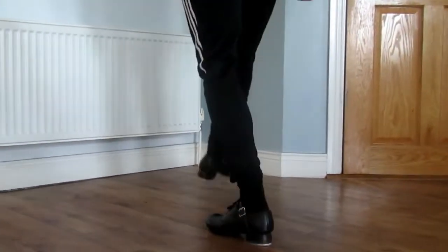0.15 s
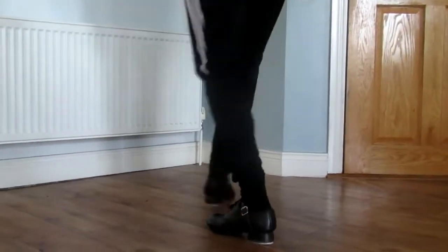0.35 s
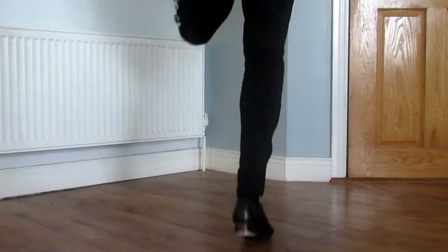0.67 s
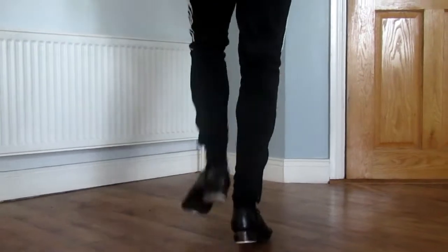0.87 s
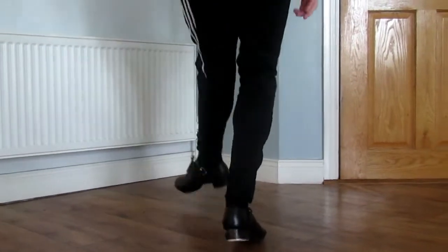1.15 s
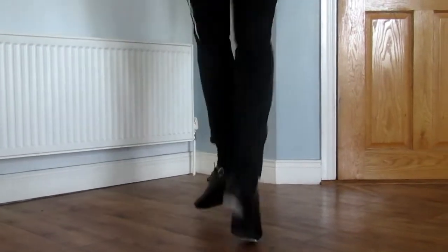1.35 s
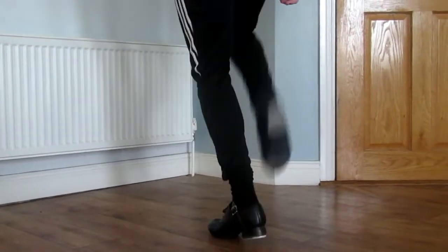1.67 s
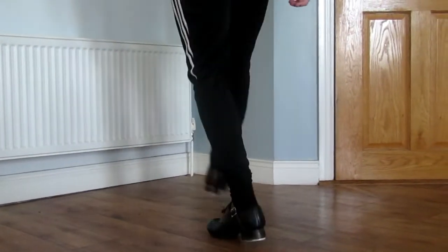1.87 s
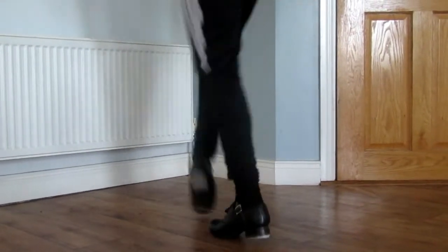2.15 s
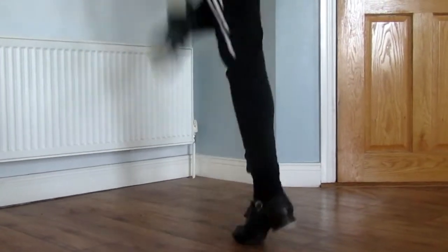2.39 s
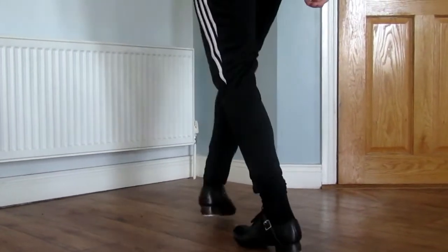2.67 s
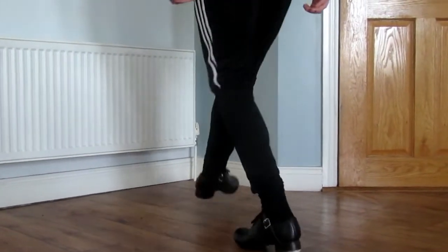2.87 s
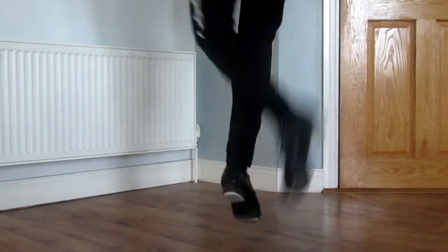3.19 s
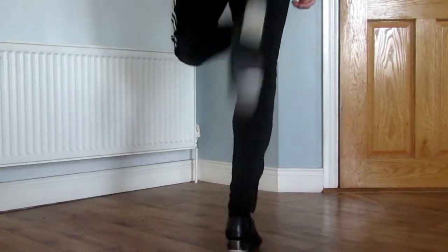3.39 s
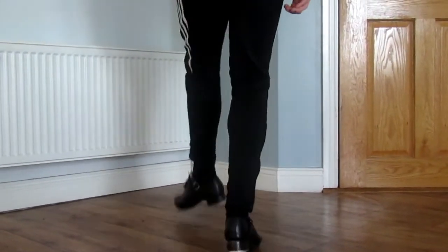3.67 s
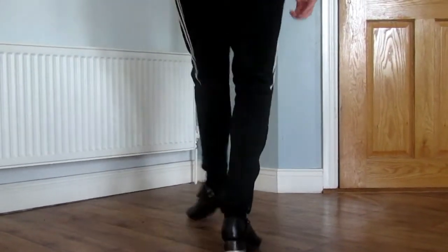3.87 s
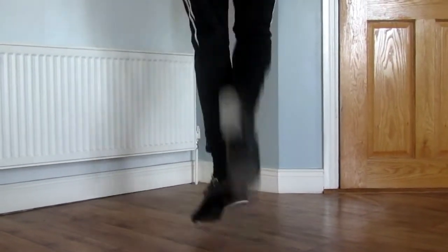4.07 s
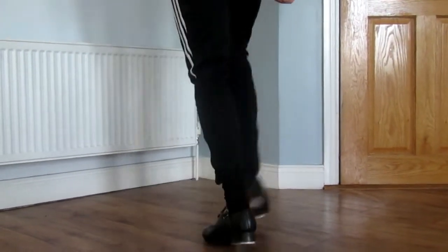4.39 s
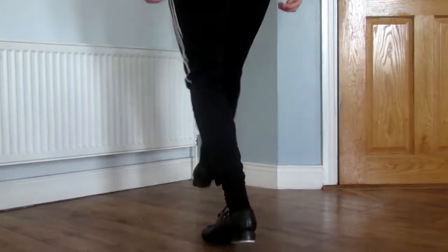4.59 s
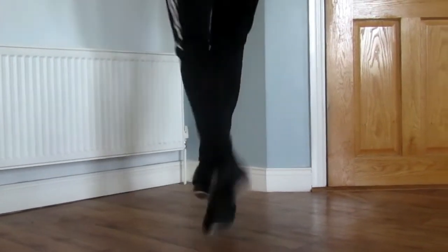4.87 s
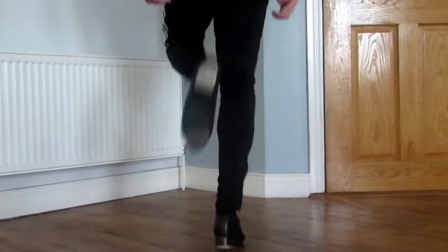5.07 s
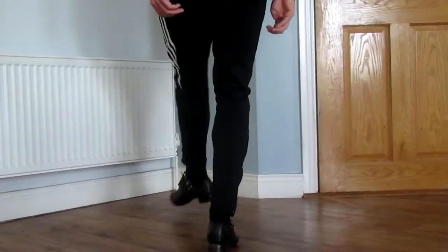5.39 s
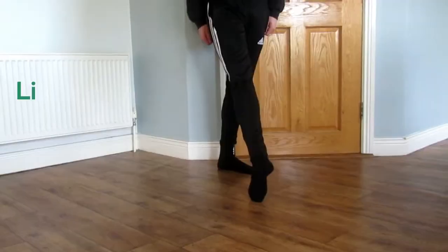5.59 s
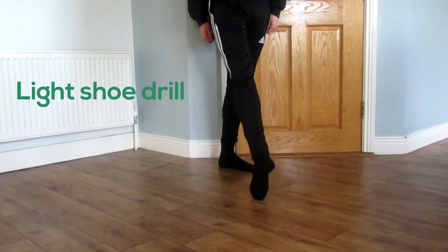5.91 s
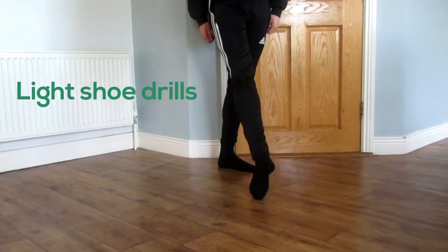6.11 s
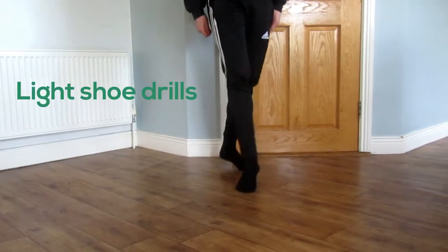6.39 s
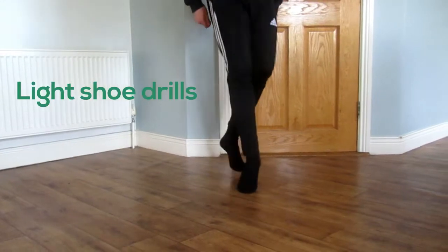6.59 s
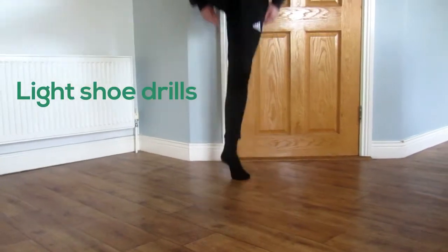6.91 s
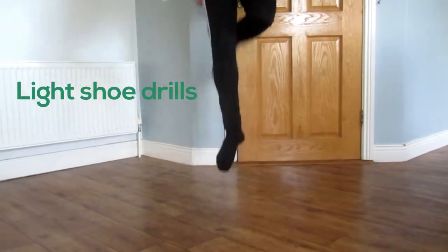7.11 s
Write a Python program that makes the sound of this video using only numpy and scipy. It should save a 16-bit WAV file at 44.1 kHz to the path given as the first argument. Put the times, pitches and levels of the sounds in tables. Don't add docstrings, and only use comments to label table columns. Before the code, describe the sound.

In a small bare room, hard dance shoes beat a wooden floor about three or four times a second, sharp clicks with woody thuds and a bright room ring. Soles scuff and buckles tick between. The ring cuts to brief total silence, then faint hiss and tiny motor ticks, before a soft-shod dancer slides, pushes off and lands with a dull double thump. Close small microphone, slightly overloaded.

```python
import sys
import numpy as np
from scipy import signal
from scipy.fft import rfft, irfft
from scipy.io import wavfile
from scipy.ndimage import uniform_filter1d

SR = 44100
rng = np.random.default_rng(int(sys.argv[2]) if len(sys.argv) > 2 else 0)


def digitize_waveform(pressure):
    field = np.atleast_2d(pressure).T
    bounded = np.clip(field, -1, 1)
    quanta = np.round(bounded * 32767).astype(np.int16)
    wavfile.write(sys.argv[1], SR, quanta)


def undo_db(level):
    steps = np.asarray(level, float) / 20
    return 10 ** steps


N = 319725
RUN_IN = SR // 2
SILENCE_START_S, SILENCE_END_S = 5.505, 5.7185


def rms_one(x):
    return x / np.sqrt(np.mean(x ** 2) + 1e-20)


def at_hz(points, hz):
    table = np.array(points)
    return np.interp(np.log(hz), np.log(table[:, 0]), table[:, 1])


def add(track, s, sound):
    i = round(s * SR) + RUN_IN
    track[i:i + len(sound)] += sound[:len(track) - i]


def struck(hz, t60, size=8192):
    t = np.arange(size) / SR
    return np.sin(2 * np.pi * hz * t) * undo_db(-60 * t / t60)


def resonance(x, hz, width_hz):
    r = np.exp(-np.pi * width_hz / SR)
    gain = (1 - r * r) / 2
    return signal.lfilter([gain, 0, -gain], [1, -2 * r * np.cos(2 * np.pi * hz / SR), r * r], x)


def band_noise(x, low, high):
    return signal.sosfilt(signal.butter(2, [low, high], "band", fs=SR, output="sos"), x)


def low_pass(x, hz):
    return signal.sosfilt(signal.butter(2, hz, fs=SR, output="sos"), x)


def coloured(x, spectrum):
    hz = np.fft.rfftfreq(len(x), 1 / SR) + 1
    below, above = (spectrum[0][0] / 2, -60), (spectrum[-1][0] * 2, -60)
    closed = [below] + list(spectrum) + [above]
    return rms_one(irfft(rfft(x) * undo_db(at_hz(closed, hz)), len(x)))


# start in seconds, peak of the tip click in dB, thud in dB, sole clack in dB, clack pitch in Hz.
FLAT_TAPS = [
    (0.0361, 0, -29, -30.5, 1110),
    (0.329, -9, -32, -32.5, 1210),
    (1.2464, -6.5, -29, -30.5, 1220),
    (3.878, -0.5, -25.5, -24.5, 1080),
]
TOE_TAPS = [
    (0.6123, 3.5, -28, -27.5, 1440),
    (3.2693, -2.5, -27.5, -26.5, 1510),
    (4.9838, 2, -29, -28.5, 1550),
]
HEEL_TAPS = [
    (0.943, 0, -23.5, -29.5, 1650),
    (1.8077, -13, -26, -23, 1670),
    (3.5972, -6.5, -24, -34, 1790),
    (4.4338, -11, -31, -28.8, 1310),
]
DROP_TAPS = [
    (2.7167, -7, -24.5, -31.5, 1420),
    (2.9623, -7.5, -30, -30.5, 1667),
    (4.7252, -13, -33.5, -33, 1590),
    (5.2887, 3, -27.5, -29, 1740),
]
TIP_TAPS = [
    (2.1411, 4.7, -35, -23.5, 1710),
    (2.3747, 7.8, -28.5, -26.5, 1845),
]
BALL_TAPS = [
    (1.4842, 3, -25, -28.5, 1665),
    (4.132, 3.5, -25.5, -28.5, 1730),
]
# boom and knock in dB over the thud, grit and air in dB over the clack,
# width of the clack in octaves.
FLAT = (0.5, -1.5, -10, -16, 0.66)
TOE = (-1.5, -15, -13.5, -17.5, 0.31)
HEEL = (-9.5, -7.5, -10.5, -10.5, 0.33)
DROP = (-4, -1.5, -11.5, -16, 0.4)
TIP = (-3, -8, -9.5, -16.5, 0.52)
BALL = (-2.5, -6, -14, -16.5, 0.4)
# tip click in dB, thud in dB, clack in dB, clack pitch in Hz.
EARLIER_TAP = (-40, -24, -33, 1500)
EARLIER_TAP_S = -0.2


def all_taps():
    kinds = ((FLAT_TAPS, FLAT), (TOE_TAPS, TOE), (HEEL_TAPS, HEEL),
             (DROP_TAPS, DROP), (TIP_TAPS, TIP), (BALL_TAPS, BALL))
    heard = sorted(row + colour for rows, colour in kinds for row in rows)
    return heard + [(EARLIER_TAP_S,) + EARLIER_TAP + HEEL]


# pitch in Hz, level in dB, time to fall 60 dB in seconds.
BOARDS = [(170, -3, 0.4), (213.8, 1.5, 0.51), (252, -19.5, 0.28), (316, -4, 0.58), (379.3, -2, 0.82),
          (421.6, 1.5, 0.4), (499, -5.5, 0.58)]


def taps():
    dull_tip_hz, sharp_from_db, db_per_octave = 1000, -5.5, 9.0
    clicks, swings = np.zeros((2, N + RUN_IN))
    rows = all_taps()[:-1]
    chance = rng.normal(0, 1, (len(rows), len(BOARDS)))
    for (s, click_db, thud_db, clack_db, clack_hz, *_, octaves), spread in zip(rows, chance):
        click_hz = dull_tip_hz * 2 ** (max(click_db - sharp_from_db, 0) / db_per_octave)
        tip = struck(click_hz * 1.3, 1.73 / click_hz, size=512)
        add(clicks, s, -undo_db(click_db - 3.0) * tip / tip.max())
        thud = struck(314, 0.04)
        add(swings, s + 0.00063, undo_db(thud_db + 14.0) * thud)
        clack = struck(clack_hz, 2.2 / (octaves * clack_hz))
        add(swings, s, -undo_db(clack_db + 17.5) * clack)
        for (hz, db, t60), z in zip(BOARDS, spread):
            height = np.sign(z) * undo_db(thud_db + db - 4.0 + 4.37 * abs(z))
            add(swings, s + 0.00403, height * struck(hz, t60, size=SR // 2))
    return clicks, swings


# delay in seconds, level in dB.
ECHOES = [(.0035, -36.5), (.0055, -16.5), (0.0134, -12.5), (0.019, -25)]


def first_echoes(clicks):
    dull = low_pass(clicks, 4500)
    return sum(undo_db(db) * np.roll(dull, round(s * SR)) for s, db in ECHOES)


def separate_reflections(at, depth_db=3.5, merge_s=0.04):
    fresh = np.zeros(N + RUN_IN)
    fresh[at] = 1
    fresh = np.minimum(signal.lfilter([1], [1, -np.exp(-1 / (merge_s * SR))], fresh), 1)
    clumps = uniform_filter1d(rng.standard_normal(N + RUN_IN), size=70)
    clumps = rms_one(uniform_filter1d(clumps, size=70))
    return undo_db(depth_db * fresh * clumps)


RING_HZ = (150, 340, 780, 3650, 7500)
RING_OCTAVES = (0.35, 0.42, 0.33, 0.29, 0.42)
# pitch in Hz, filling time in seconds.
BUILD = [(100, 0.0031), (300, 0.013), (1000, 0.00081), (8000, 0.0047)]
# pitch in Hz, time to fall 60 dB in seconds.
ROOM_T60 = [(80, 0.37), (210, 0.48), (560, 0.61), (1470, 0.61), (3880, 0.59), (10200, 0.38)]


def tap_reverberation(crack_db=-12.0, crack_t60=0.017):
    edges = 70 * 2 ** np.arange(0, 8.0, 1 / 4)
    white, out = rng.standard_normal((2, N + RUN_IN)), np.zeros(N + RUN_IN)
    rows = np.array(all_taps())
    thud_db, clack_db, clack_hz, boom_db, knock_db, grit_db, air_db, octaves = rows[:, 2:].T
    at = np.round(rows[:, 0] * SR).astype(int) + RUN_IN
    levels_db = np.column_stack([thud_db + boom_db, thud_db, thud_db + knock_db,
                                 clack_db, clack_db + grit_db, clack_db + air_db])
    low_hz = np.tile(RING_HZ[:3], (len(rows), 1))
    high_hz = np.tile(RING_HZ[3:], (len(rows), 1))
    centres = np.column_stack([low_hz, clack_hz, high_hz])
    widths = np.insert(np.tile(RING_OCTAVES, (len(rows), 1)), 3, octaves, axis=1)
    clumps = separate_reflections(at)
    for k, (low, high) in enumerate(zip(edges, edges[1:])):
        hz = np.sqrt(low * high)
        share = np.exp(-0.5 * (np.log2(hz / centres) / widths) ** 2) / widths
        power = np.zeros(N + RUN_IN)
        power[at] = np.sum(undo_db(levels_db) ** 2 * share, axis=1) * undo_db(-7.5)
        ring, crack = [signal.lfilter([1], [1, -undo_db(-120 / (t60 * SR))], power + 1e-18)
                       for t60 in (at_hz(ROOM_T60, hz), crack_t60)]
        fill = np.exp(-1 / (at_hz(BUILD, hz) * SR))
        envelope = signal.lfilter([1 - fill], [1, -fill], ring + undo_db(crack_db) * crack)
        band = band_noise(white[k % 2] * clumps, low, high)
        out += np.sqrt(np.abs(envelope)) * rms_one(band)
    return out


# start in seconds, level in dB, length in seconds, centre pitch in Hz.
SCUFFS = [(0.034, -30, 0.054, 5970), (0.462, -36, 0.065, 5000), (0.965, -40, 0.03, 6030),
          (1.341, -43, 0.085, 3960), (1.731, -37.5, 0.36, 4240), (2.964, -49, 0.073, 6000),
          (5.3, -34, 0.051, 6760), (1.597, -38, 0.11, 6880), (1.823, -37, 0.22, 5060),
          (2.781, -46, 0.046, 11000), (3.09, -45, 0.096, 8000), (3.559, -43, 0.048, 4980),
          (3.603, -29.5, 0.036, 5560), (3.792, -34.5, 0.025, 7020), (3.998, -37.5, 0.044, 3000),
          (4.842, -42.5, 0.061, 1504), (4.311, -39, 0.044, 6800), (4.445, -38.5, 0.066, 6040),
          (4.677, -41.5, 0.13, 7000), (4.86, -40, 0.13, 6700), (5.21, -57, 0.041, 8000),
          (6.347, -75, 0.035, 1300)]


def scuffs(grain_db=4.5):
    out = np.zeros(N + RUN_IN)
    draws = rng.standard_normal((len(SCUFFS), 2, 8192))
    for (s, db, length, hz), (noise, grain) in zip(SCUFFS, draws):
        phase = np.arange(8192) / SR / length
        swell = (1 - np.exp(-phase / 0.26)) * np.exp(-1.5 * phase ** 2)
        rough = undo_db(grain_db * rms_one(uniform_filter1d(grain, size=60)))
        drag = rms_one(resonance(noise * rough, hz, hz * 1.3))
        add(out, s, undo_db(db + 1.5) * swell * drag)
    return out


# level in dB, pitch in Hz, time to fall 60 dB in seconds.
BUCKLE_RING = (-61, 13700, 0.58)


def buckle_ring():
    db, hz, t60 = BUCKLE_RING
    out = np.zeros(N + RUN_IN)
    shimmer = rms_one(resonance(rng.standard_normal(8192), hz, 700))
    add(out, 2.783, shimmer * undo_db(db - 60 * np.arange(8192) / SR / t60))
    return out


# start in seconds, peak in dB, pitch in Hz.
TICKS = [(1.257, -14.5, 9000), (1.372, -25.5, 2800), (1.3785, -20.5, 3300), (1.3808, -18.5, 2420),
         (1.604, -34, 8000), (1.621, -25.5, 6000), (1.65, -27, 8400), (1.679, -29, 10000),
         (1.846, -31, 5500), (2.727, -20, 5800), (2.783, -27, 11500), (2.80, -25, 12000),
         (3.107, -35, 10500), (3.255, -19.5, 7000), (3.56, -29, 5700), (3.793, -32, 8000),
         (3.888, -9, 6500), (4.024, -26.5, 2700), (4.318, -39, 8000), (4.68, -34, 11000),
         (4.697, -28, 8550), (4.698, -34, 2580), (4.891, -28, 7000), (4.921, -23.5, 9000),
         (6.342, -48, 1300), (6.434, -41, 2600), (6.454, -43, 2480), (6.682, -37.5, 840),
         (6.936, -38, 2300), (6.937, -32, 10500)]


def ticks():
    answer_s, answer_db, answer_hz = 0.014, 2, 8000
    out = np.zeros(N + RUN_IN)
    t = np.arange(1024) / SR
    answers = [(row[0] + answer_s, row[3] + answer_db, answer_hz) for row in all_taps()[:-1]]
    for s, db, hz in TICKS + answers:
        swell = 1 - np.exp(-t * hz / 1.2)
        add(out, s, undo_db(db + 11.5) * swell * struck(hz, 11.0 / hz, size=1024))
    return out


# start in seconds, peak in dB, pitch in Hz.
SOFT_STEPS = [(0.461, -18.5, 188), (.482, -16, 156), (1.531, -38, 133), (3.14, -21, 190), (3.163, -20, 337),
              (0.511, -21.5, 233), (4.87, -29.5, 189), (4.928, -29, 140), (1.378, -25, 200),
              (6.455, -36, 304), (7.2338, -20.5, 242), (7.2435, -14.5, 260)]


def soft_steps():
    out = np.zeros(N + RUN_IN)
    swell = 1 - np.exp(-np.arange(8192) / SR / 0.0011)
    for s, db, hz in SOFT_STEPS:
        add(out, s, undo_db(db + 2.5) * swell * struck(hz, 0.045))
    return out


# pitch in Hz, level in dB.
ROOM_COLOUR = [(80, -1), (250, 1.5), (1000, -2.5), (3000, -7), (8000, -10.5), (14000, -17)]


def room(x, build_s=0.014):
    t = np.arange(SR) / SR
    edges = 60 * 2 ** np.arange(0, 8.3, 0.5)
    white, tail = rng.standard_normal((2, SR)), np.zeros(SR)
    for k, (low, high) in enumerate(zip(edges, edges[1:])):
        hz = np.sqrt(low * high)
        fall = undo_db(at_hz(ROOM_COLOUR, hz) - 60 * t / at_hz(ROOM_T60, hz))
        tail += fall * band_noise(white[k % 2], low, high)
    tail *= undo_db(-29.5) * (1 - np.exp(-t / build_s))
    return signal.fftconvolve(x, tail)[:len(x)]


def gestures(rows, rise_db_per_s, fall_db_per_s):
    t = np.arange(N) / SR
    moves = []
    for s, db, hold in rows:
        before, after = np.maximum(s - t, 0), np.maximum(t - s - hold, 0)
        moves.append(db - rise_db_per_s * before - fall_db_per_s * after)
    return np.max(moves, axis=0)


# time in seconds, level in dB.
RISING = [
    (6.3, -72),
    (6.346, -60),
    (6.431, -59),
    (6.436, -45),
    (6.552, -42.5),
    (6.704, -44.5),
    (6.82, -57),
]
LANDING = [
    (6.912, -58),
    (6.94, -52),
    (7.0, -51.5),
    (7.078, -54.5),
    (7.212, -45.5),
]
# start in seconds, level in dB, hold in seconds.
WEIGHT_SHIFTS = [
    (6.455, -44.5, 0.017),
    (6.615, -36.5, .025),
    (6.68, -33.5, 0.031),
    (6.94, -42.5, 0.076),
    (7.228, -43, .05),
]
# start in seconds, level in dB, hold in seconds.
LEG_SWINGS = [
    (6.53, -47.5, 0.084),
    (6.94, -55.5, 0.087),
    (7.2, -50.5, .05),
]
# pitch in Hz, level in dB per Hz.
SLIDE = [(400, -2.5), (650, 3.5), (1000, -0.5), (1600, -1.5), (2500, -6), (3500, -12)]
CLOTH = [(1760, -24), (3000, 4), (5920, -1.5), (6420, -2), (11900, -9.5), (15000, -16)]


def soft_shoe():
    slide_db = np.interp(np.arange(N) / SR, *np.transpose(RISING + LANDING), left=-99)
    noise = rng.standard_normal((3, N))
    flex = coloured(noise[0], [(70, -13.0), (110, -2.5), (150, 0.5), (230, -5.5), (400, -11.5)])
    flex = undo_db(gestures(WEIGHT_SHIFTS, rise_db_per_s=284, fall_db_per_s=153)) * flex
    slide = undo_db(slide_db) * coloured(noise[1], SLIDE)
    cloth = undo_db(gestures(LEG_SWINGS, rise_db_per_s=108, fall_db_per_s=65)) * coloured(noise[2], CLOTH)
    return flex + slide + cloth


# start in seconds, peak in dB, pitch in Hz.
JOLTS = [
    (1.5, -35, 45),
    (3.57, -53, 60),
    (4.17, -40, 40),
    (5.05, -42, 45.2),
    (6.64, -34, 49.6),
    (6.7, -31, 65.5),
]


def jolts():
    out = np.zeros(N + RUN_IN)
    swell = 1 - np.exp(-np.arange(SR // 2) / SR / 0.014)
    for s, db, hz in JOLTS:
        add(out, s, undo_db(db + 3.5) * swell * struck(hz, 0.27, size=SR // 2))
    return out


def focus_motor():
    start_s, step_s, count = 5.733, 0.0401, 11
    out = np.zeros(N + RUN_IN)
    t = np.arange(1024) / SR
    kick = (1 - np.exp(-t / 0.0014)) * np.exp(-t / 0.0049)
    for k, noise in enumerate(rng.standard_normal((count, 1024))):
        ring = resonance(noise * kick, 2600, 460)
        level_db = -48 + 1 * noise[0]
        add(out, start_s + k * step_s, undo_db(level_db) * ring / np.abs(ring).max())
    return out[RUN_IN:]


# pitch in Hz, level in dB per Hz.
HISS = [(25, -20), (54, -0.5), (77, -12), (150, -7.5), (1450, -15), (1720, -20), (11600, -31.5),
        (14800, -41.5)]
# pitch in Hz, rms level in dB, width in Hz.
WHINES = [(48.3, -70.5, 6.1), (1184, -66.5, 40), (1550, -74.5, 40), (7200, -75, 60), (11810, -75, 30)]


def camera():
    t = np.arange(N) / SR
    out = undo_db(-53.5) * coloured(rng.standard_normal(N), HISS)
    wobble = rng.standard_normal((len(WHINES), N))
    for (hz, db, width), noise in zip(WHINES, wobble):
        wavering = rms_one(resonance(resonance(noise, hz, width), hz, width))
        out += undo_db(db) * (0.7 * wavering + 0.9 * np.sin(2 * np.pi * hz * t))
    return out


def scene():
    clicks, swings = taps()
    clicks = low_pass(clicks, 7000)
    hard_taps = clicks + first_echoes(clicks) + swings + tap_reverberation()
    drags, small, soft = scuffs() + buckle_ring(), ticks(), soft_steps()
    wet = room(undo_db(9.0) * drags + undo_db(4) * small + undo_db(-1.0) * soft)
    shoes = hard_taps + drags + small + soft + wet
    shoes = signal.sosfilt(signal.butter(4, 112, "high", fs=SR, output="sos"), shoes)
    shoes = low_pass(shoes, 12500)
    shoes = (shoes + jolts())[RUN_IN:]
    t = np.arange(N) / SR
    shoes[(t > SILENCE_START_S) & (t < 6.3)] = 0
    return (shoes + soft_shoe() + camera() + focus_motor())[None]


def top_cut(x):
    return signal.sosfilt(signal.butter(12, 16140, fs=SR, output="sos"), x)


def record(dry):
    t = np.arange(N) / SR
    x = np.clip(dry, -1, 1)
    x = x - 0.85 * resonance(x, 7930, 120)
    x = signal.sosfiltfilt(signal.ellip(8, 0.25, 15, 15050, fs=SR, output="sos"), x)
    x = np.clip(x, -1, 1) * ((t < SILENCE_START_S) | (t > SILENCE_END_S))
    return top_cut(x)


dry = scene()
out = record(dry)
digitize_waveform(out)
```